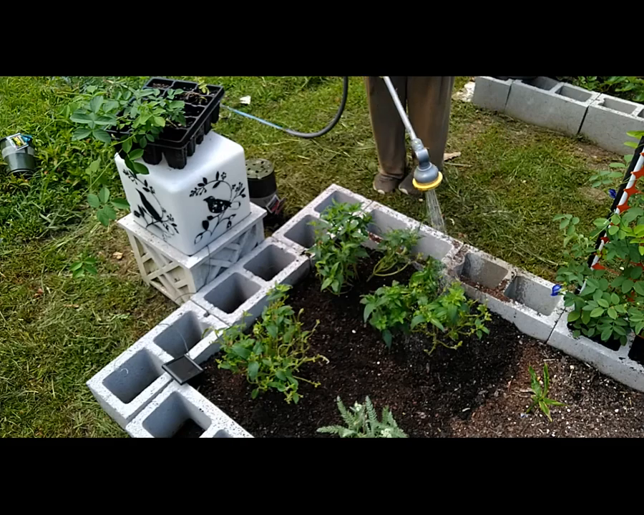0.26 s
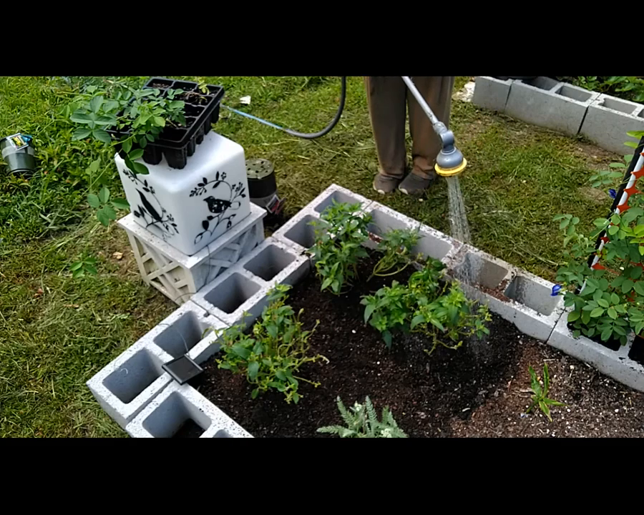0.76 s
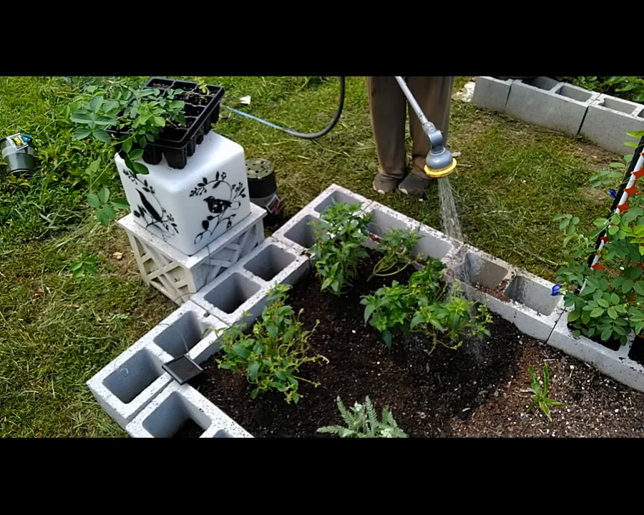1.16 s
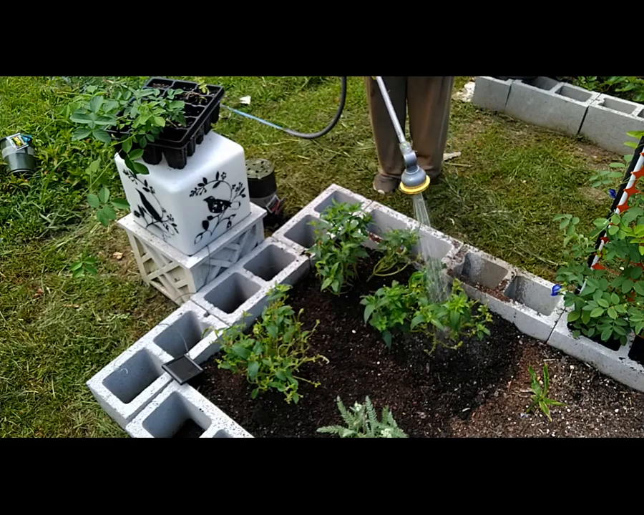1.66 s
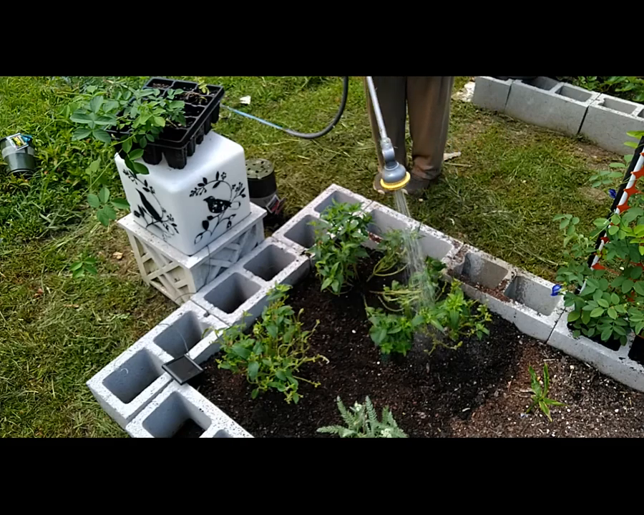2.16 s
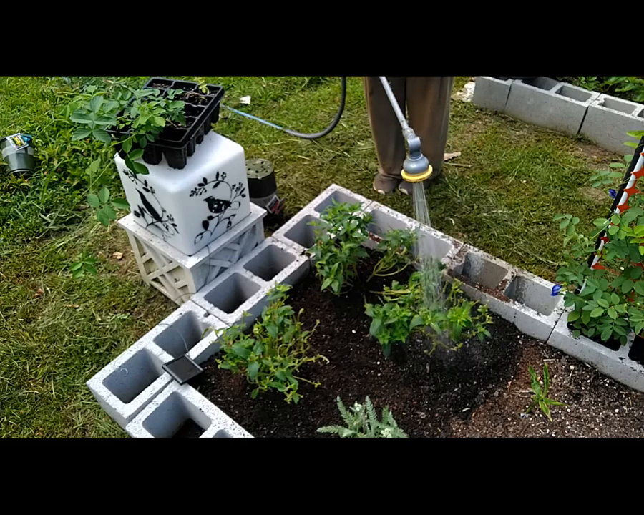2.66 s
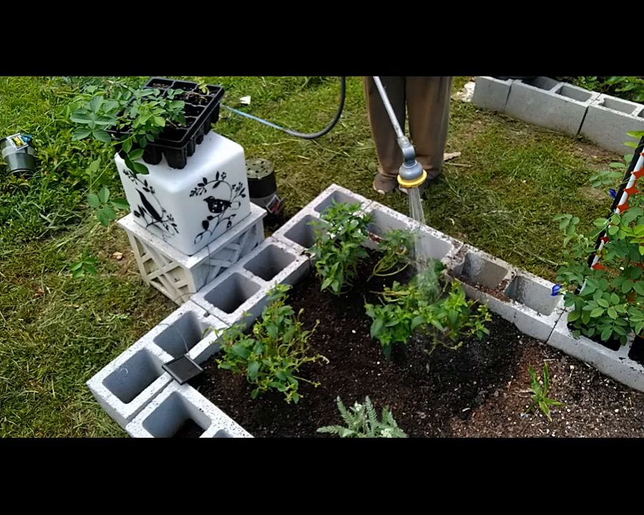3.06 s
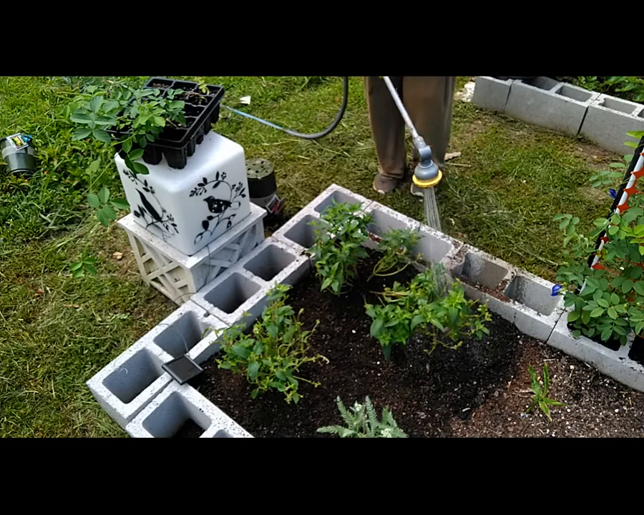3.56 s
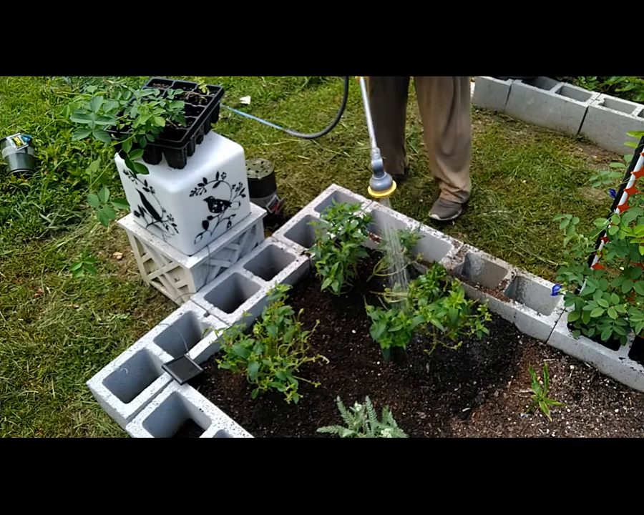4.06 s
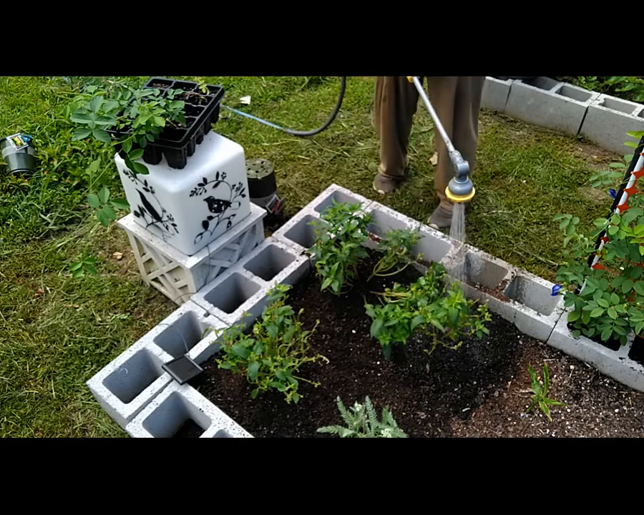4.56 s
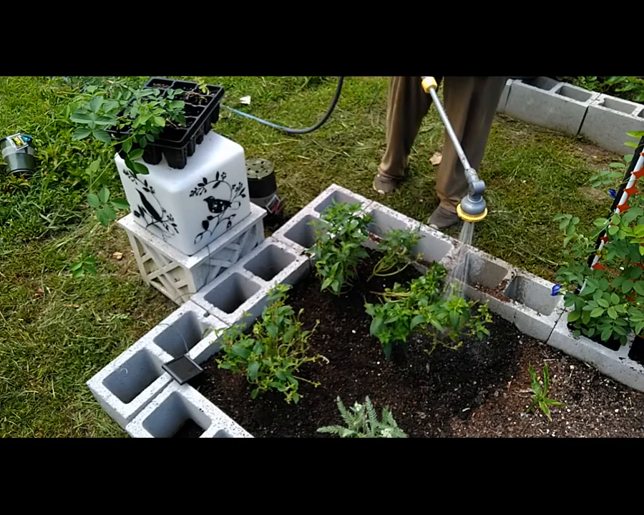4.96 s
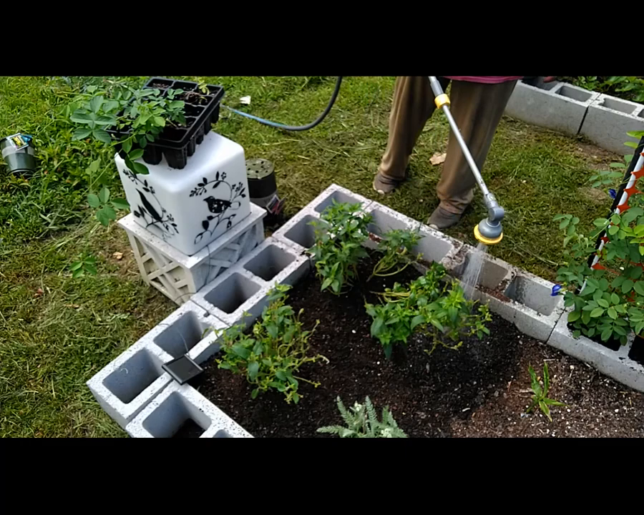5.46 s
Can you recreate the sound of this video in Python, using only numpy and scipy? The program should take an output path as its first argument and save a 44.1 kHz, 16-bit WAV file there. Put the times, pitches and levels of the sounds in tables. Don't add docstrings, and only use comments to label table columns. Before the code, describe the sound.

A garden shower wand hisses finely over leaves and soil while a bird whistles and a vehicle rumbles past on a far road.

```python
import sys
import numpy as np
from scipy import signal
from scipy.fft import rfft, irfft
from scipy.io import wavfile
from scipy.ndimage import uniform_filter1d

SR = 44100
rng = np.random.default_rng(int(sys.argv[2]) if len(sys.argv) > 2 else 0)


def to_linear_factor(level_db):
    exponent = np.asarray(level_db, float) / 20
    return 10 ** exponent


def wrap_up_sound(samples):
    columns = np.atleast_2d(samples).T
    tamed = np.clip(columns, -1, 1)
    steps = np.round(tamed * 32767).astype(np.int16)
    wavfile.write(sys.argv[1], SR, steps)


N = 252252
HZ = np.maximum(np.arange(N // 2 + 1) * SR / N, 1)

# frequency in Hz, level in dB per Hz.
LEAF_SPECTRUM = [(1530, -42), (2600, -23), (3380, -16), (3750, -6), (4880, -4.5), (6020, -5), (6740, -1.5),
                 (7650, -6), (8130, -4), (8760, -5), (10700, -8), (11700, -6.5), (15600, -9.5)]
# centre in Hz, width in Hz, lift in dB.
INSECT_BANDS = [(5180, 62, 6.5), (6900, 250, 4.5), (7680, 140, 11), (7900, 190, -4.5), (8900, 400, 4),
                (9250, 180, -8), (10700, 350, -1), (10900, 610, -3), (13300, 390, 7)]
# time in seconds, level in dB.
FAR_TRAFFIC_FADE = [
    (0, -63),
    (1.7, -62.5),
    (2.9, -64),
    (3.4, -66),
    (5.72, -71),
]
# time in seconds, nearness in dB.
VEHICLE_NEARNESS = [(0.0, 3), (.17, -2), (1.1, -0.5), (1.9, 3.5), (2.5, -1), (3.0, 2), (3.25, -4.5),
                    (3.6, 4), (4.2, 6.5), (4.33, 15.5), (4.52, 20), (4.6, 21), (4.83, 19.5), (4.97, 20.5),
                    (5.35, 23), (5.45, 19), (5.64, 3), (5.72, 2)]
# frequency in Hz, level in dB per Hz.
RUMBLE_SPECTRUM = [(15, -59), (25, -26), (32, -30), (35, -18), (51, -9.5), (70, 4.5), (98, -1.5), (150, 4),
                   (162, 1), (210, -13.5), (260, -16.5), (340, -26.5), (570, -120)]
# frequency in Hz, level in dB per Hz.
MURMUR_SPECTRUM = [(110, -27), (180, -13), (211, -8), (325, -9), (695, -3.5), (1020, -9), (1320, -11.5),
                   (1720, -14), (1900, -16), (2470, -42), (4180, -120)]
# frequency in Hz, level in dB per Hz.
RUSH_SPECTRUM = [(880, -10), (1500, -6.5), (1770, -6), (1950, -3), (2120, 0), (2780, 3.5), (3580, 1.5),
                 (4000, -9), (5200, -58), (8800, -120)]
# time in seconds, firing rate in Hz, firing level in dB,
# second order above firing in dB.
ENGINE_PASS = [
    (3.7, 74.79, -66, -2),
    (4.254, 77.33, -55, -5.5),
    (4.6, 78.6, -44, 4),
    (4.78, 75.4, -57.5, 12),
    (4.89, 74.83, -44, -5.5),
    (5.03, 74.46, -37.5, -8.5),
    (5.39, 72.76, -37.5, -9),
    (5.5, 73.3, -51.5, -4.5),
    (5.72, 72.5, -68.5, 6.5),
]
# time in seconds, centre in Hz, level in dB.
HIGH_CHOIR_SWELLS = [(0.55, 2030, -75), (0.9, 2010, -64.5), (1.35, 2020, -67.5), (2.0, 2025, -61.5),
                     (2.3, 2010, -67), (3.3, 2030, -66.5), (4.4, 2015, -62)]
# time in seconds, centre in Hz, level in dB.
LOW_CHOIR_SWELLS = [(2.7, 1400, -78), (2.92, 1420, -67.5), (3.05, 1410, -74), (3.8, 1330, -67),
                    (4.34, 1360, -65), (4.95, 1367, -69), (5.16, 1360, -66), (5.4, 1377, -58),
                    (5.72, 1385, -72)]
# start in seconds, length in seconds, first pitch in Hz, level in dB.
BIRD_WHISTLES = [
    (3.458, 0.24, 2660, -67.5),
    (4.337, 0.35, 2692, -51),
    (5.151, 0.36, 2616, -50.5),
]
# middle in seconds, half length in seconds, top in Hz,
# level in dB, slide in Hz.
BIRD_CHIPS = [
    (4.107, .015, 6500, -50, -910),
    (4.194, .018, 3270, -54, 25),
    (5.016, .022, 3420, -52, 30),
    (5.403, .010, 3030, -61, -150),
    (3.215, .014, 3500, -62, -15),
]
# time in seconds, peak in dB.
BIG_DROPS = [(1.889, -24), (1.976, -23), (2.118, -17), (2.222, -22), (2.346, -21), (2.863, -22),
             (2.974, -21), (3.0088, -15), (3.179, -23), (3.2487, -15), (3.797, -23), (5.419, -23)]
# time in seconds, level in dB, fineness of the splash in dB.
SHOWER_SWEEP = [(1.4, -64, 1), (1.46, -58, 1), (1.66, -43, -2.5), (1.82, -43.5, 0.5), (2.19, -42.5, 0),
                (2.4, -45, -0.5), (2.87, -42.5, -0.5), (3.1, -41.5, 0), (3.29, -43, -1.5), (3.9, -43.5, 0),
                (4.28, -42, 0), (4.54, -43.5, -0.5), (4.63, -42.5, -0.5), (4.84, -43.5, -2.5),
                (5.07, -43, 2), (5.54, -44, 0.5), (5.72, -45.5, 3.5)]
# frequency in Hz, level in dB per Hz.
SPRAY_SPECTRUM = [(1760, -51), (3000, -29.5), (3720, -20.5), (4280, -14.5), (4790, -16), (5170, -11.5),
                  (5660, -15), (7800, -0.5), (11400, -6.5), (12900, -5), (14300, -6), (15100, -7.5),
                  (15900, -23)]
# centre in Hz, width in Hz, lift in dB.
HOUSING_RESONANCES = [(5160, 360, 3), (6600, 490, 1.5), (7320, 280, -2.5), (7670, 220, 1.5),
                      (12900, 900, 1.5)]
# frequency in Hz, likeness from -1 to 1.
PORT_LIKENESS = [(60, 1), (300, 0.86), (700, -0.048), (1200, -0.19), (2000, .4), (2800, -0.19),
                 (4500, 0.24), (5800, -0.19), (6700, -0.0013), (6950, 1), (8150, 0.87), (8400, 1),
                 (15000, 1)]
# frequency in Hz, quarter-turn share of the unshared part from -1 to 1.
PORT_LAG = [(150, -0.4), (500, -0.5), (900, 0.17), (1500, 0.6), (1900, 0.23), (3000, 0.97), (3900, 0.),
            (4900, 0.93), (5500, 0.4), (6200, -0.1), (16000, -0.2)]
# time in seconds, loss of the shared middle range in dB.
SHARED_MIDDLE_LOSS = [(0, 0.5), (.4, 1), (.52, 3), (.88, 3), (1.0, 1), (1.5, 1), (1.75, 3), (2.55, 2.5),
                      (3.2, 1.5), (3.62, 4), (3.85, 1.5), (4.28, 2), (4.46, 6.5), (5.05, 7.5), (5.24, 3.5),
                      (5.35, 4), (5.39, 11), (5.72, 5)]
# frequency in Hz, left minus right in dB.
SIDE_BALANCE = [(60, -1.0), (2300, -0.5), (4500, .8), (6100, 3.2), (6950, 0.3), (8150, -0.5), (8350, -6.5),
                (10250, 0.5), (10500, -12), (12200, -1), (13200, -6), (15700, -8)]


def rms_one(x):
    return x / np.sqrt(np.mean(x ** 2) + 1e-20)


def in_time(rows):
    s, *columns = np.transpose(rows)
    return [np.interp(np.arange(N) / SR, s, c) for c in columns]


def while_on(rows, fade_s):
    t = np.arange(N) / SR
    inside_s = np.minimum(t - rows[0][0], rows[-1][0] - t)
    return np.clip(inside_s / fade_s + 1, 0, 1)


def at_hz(points):
    hz, value = np.transpose(points)
    return np.interp(np.log(HZ), np.log(hz), value)


def humps_db(rows):
    return sum(db / (1 + (2 * (HZ - hz) / width) ** 2) for hz, width, db in rows)


def drift(rate_hz):
    r = np.exp(-80 * np.pi * rate_hz / SR)
    noise = rng.standard_normal(N // 40 + 2002)
    slow = signal.lfilter([1], [1, -2 * r, r * r], noise)[2000:]
    return np.interp(np.arange(N) / 40, np.arange(len(slow)), rms_one(slow))


def coloured(pair, gain):
    alike = np.clip(at_hz(PORT_LIKENESS), -.99, .995)
    lag = np.clip(at_hz(PORT_LAG), -.95, .95)
    one, other = rfft(pair)
    unshared = 1j * lag * one + np.sqrt(1 - lag ** 2) * other
    return irfft(np.array([one, unshared]) * gain * np.sqrt([1 + alike, 1 - alike]), N)


def garden():
    gain = to_linear_factor(at_hz(LEAF_SPECTRUM) + humps_db(INSECT_BANDS))
    hush = coloured(rng.standard_normal((2, N)), gain)
    return to_linear_factor(-57 + 0.18 * drift(14.0)) * rms_one(hush)


def road_layer(spectrum):
    return rms_one(coloured(rng.standard_normal((2, N)), to_linear_factor(at_hz(spectrum))))


def road():
    near_db = in_time(VEHICLE_NEARNESS)[0]
    far_db = in_time(FAR_TRAFFIC_FADE)[0]
    splash_db = in_time(SHOWER_SWEEP)[0]
    rumble = to_linear_factor(-61 + 0.58 * near_db + drift(3.9)) * road_layer(RUMBLE_SPECTRUM)
    murmur_level = np.hypot(to_linear_factor(far_db), to_linear_factor(-76.5 + .75 * near_db))
    murmur = murmur_level * to_linear_factor(1.3 * drift(2.5)) * road_layer(MURMUR_SPECTRUM)
    rush_level = np.hypot(to_linear_factor(splash_db - 22.5), to_linear_factor(-68.5 + 0.53 * near_db))
    rush = rush_level * to_linear_factor(1.04 * drift(6.5)) * road_layer(RUSH_SPECTRUM)
    return rumble + murmur + rush


def engine():
    hz, first_db, above_db = in_time(ENGINE_PASS)
    turn = 2 * np.pi * np.cumsum(hz) / SR
    first = to_linear_factor(first_db + 0.64 * drift(2.7)) * np.sin(turn + 0.15 * drift(5.5))
    second = to_linear_factor(first_db + above_db + 1.5 * drift(8)) * np.sin(2 * turn + 0.25 * drift(5.0))
    hum = np.sqrt(2) * while_on(ENGINE_PASS, fade_s=.2) * (first + second)
    return signal.sosfilt(signal.butter(4, 58., "high", fs=SR, output="sos"), hum)


def choir(rows, width_hz, alike):
    hz, db = in_time(rows)
    turn = 2 * np.pi * np.cumsum(hz) / SR
    parts = np.array([drift(width_hz) * np.cos(turn) + drift(width_hz) * np.sin(turn) for part in (0, 1)])
    swell = to_linear_factor(db + 0.3 * drift(3.9)) * while_on(rows, fade_s=.15)
    unshared_gain = np.sqrt((1 - alike) / (1 + alike))
    return swell * parts * np.array([[1.], [unshared_gain]])


def whistle(s, length_s, first_hz, db):
    fall_hz_per_s, tail_fall_hz_per_s = 3300, 1150
    fade_db_per_s, tail_fade_db_per_s = 25, 45
    knee_hz, knee_soft_s, attack_s = 1880, 0.054, .02
    t = np.linspace(0, length_s, 30)
    knee_s = (first_hz - knee_hz) / fall_hz_per_s
    past = knee_soft_s * np.logaddexp(0, (t - knee_s) / knee_soft_s)
    before = t - past
    hz = first_hz - fall_hz_per_s * before - tail_fall_hz_per_s * past
    rise_db = -12 * np.clip(1 - t / attack_s, 0, 1)
    level_db = db + rise_db - fade_db_per_s * before - tail_fade_db_per_s * past
    return np.transpose([s + t, hz, level_db])


def chip(s, half_s, top_hz, db, slide_hz):
    u = np.linspace(-1, 1, 9)
    arch_hz_per_s2, edge_db = 1.4e6, -6
    hz = top_hz + slide_hz * u - arch_hz_per_s2 * (half_s * u) ** 2
    return np.transpose([s + half_s * u, hz, db + edge_db * u ** 4])


def bird():
    direct, waver, flutter = np.zeros(N), drift(30), drift(42)
    notes = [whistle(*row) for row in BIRD_WHISTLES] + [chip(*row) for row in BIRD_CHIPS]
    for note in notes:
        hz, db = in_time(note)
        turn = 2 * np.pi * np.cumsum(hz * (1 + 0.00313 * waver)) / SR
        level = np.sqrt(2) * to_linear_factor(db + 2.6 * flutter) * while_on(note, fade_s=0.0065)
        direct = direct + level * np.sin(turn)
    length = SR // 3
    tail = rng.standard_normal((2, length)) * to_linear_factor(-60 * np.arange(length) / SR / 0.75)
    tail[:, :SR // 60] = 0
    tail = tail / np.sqrt(np.sum(tail ** 2, axis=1, keepdims=True))
    echo = signal.fftconvolve(direct[None], tail, axes=1)[:, :N]
    return np.array([direct, -.3 * np.roll(direct, 3)]) + to_linear_factor(-9) * echo


def ticks():
    clicks = np.zeros(N + 400)
    for s, db in BIG_DROPS:
        snap = round(s * SR)
        clicks[snap] += to_linear_factor(db + 3.0)
        later = (20 + 300 * rng.random(4)).astype(int)
        clicks[snap + later] += to_linear_factor(db - 4) * rng.uniform(-1, 1, 4)
    bright = signal.butter(3, [8500., 15500.], "band", fs=SR, output="sos")
    return signal.sosfilt(bright, clicks[:N])


def drops(per_s, spread_db):
    sizes = to_linear_factor(spread_db * np.minimum(rng.exponential(1, (2, N)), 5))
    signs = rng.choice([-1, 1], (2, N))
    return rms_one(sizes * signs * (rng.random((2, N)) < per_s / SR))


def shower():
    level_db, fine_db = in_time(SHOWER_SWEEP)
    clumps = to_linear_factor(0.038 * drift(41) + 0.64 * drift(60))
    raw = clumps * (0.6 * rng.standard_normal((2, N)) + .5 * drops(per_s=8000., spread_db=1.5))
    gain = to_linear_factor(at_hz(SPRAY_SPECTRUM) + humps_db(HOUSING_RESONANCES))
    above_low = np.clip((HZ - 6700) / 300, 0, 1)
    above_main = np.clip((HZ - 9300) / 1400, 0, 1)
    low = rms_one(coloured(raw, gain * (1 - above_low)))
    main = rms_one(coloured(raw, gain * (above_low - above_main)))
    top = rms_one(coloured(raw, gain * above_main))
    lost_db = 0.067 * in_time(SHARED_MIDDLE_LOSS)[0]
    patter = to_linear_factor(-13 - lost_db + 0.42 * drift(6.8)) * low
    hiss = to_linear_factor(-5.0 + 0.65 * drift(7.1)) * main
    fizz = to_linear_factor(-8.5 + fine_db + 0.52 * drift(3.2)) * top
    return while_on(SHOWER_SWEEP, fade_s=0.2) * to_linear_factor(level_db) * (patter + hiss + fizz)


def patchy_middle(shared, low_hz, high_hz, patchy_db):
    hz, s, cells = signal.stft(shared, SR, nperseg=1024)
    inside = np.clip((hz - low_hz) / 400, 0, 1) * np.clip((high_hz - hz) / 700, 0, 1)
    patches = uniform_filter1d(rng.standard_normal(cells.shape), size=5, axis=0)
    patches = rms_one(uniform_filter1d(patches, size=5, axis=1))
    loss_db = np.interp(s, *np.transpose(SHARED_MIDDLE_LOSS)) + patchy_db * patches
    return signal.istft(cells * to_linear_factor(-inside[:, None] * loss_db), SR)[1][:N]


def scene():
    shared, unshared = garden() + road() + shower()
    shared = patchy_middle(shared, low_hz=2890.0, high_hz=5950.0, patchy_db=1.5)
    high_choir = choir(HIGH_CHOIR_SWELLS, width_hz=71.0, alike=0.54)
    low_choir = choir(LOW_CHOIR_SWELLS, width_hz=57.0, alike=0.5)
    voices = high_choir + low_choir + bird()
    shared = shared + voices[0] + engine() + ticks()
    unshared = unshared + voices[1]
    shade = to_linear_factor(np.outer([.5, -.5], at_hz(SIDE_BALANCE)))
    return irfft(rfft([shared + unshared, shared - unshared]) * shade, N)


def band_limit(x):
    return signal.sosfilt(signal.butter(12, 16020, fs=SR, output="sos"), x)


def record(dry):
    mix = irfft(rfft(dry) * (HZ < 15760), N)
    return band_limit(mix)


dry = scene()
out = record(dry)
wrap_up_sound(out)
```